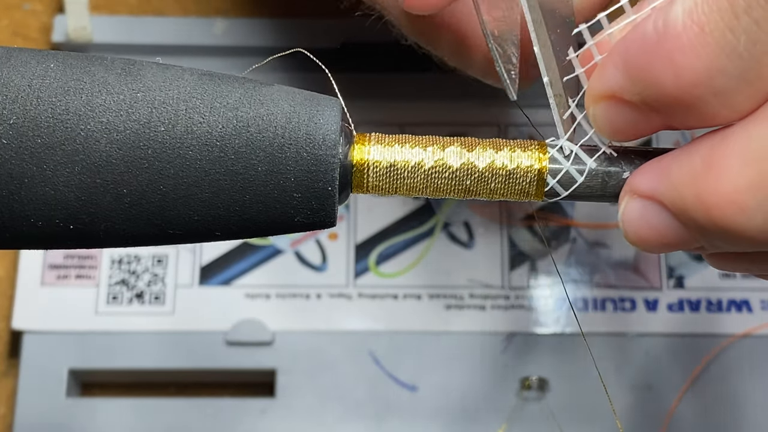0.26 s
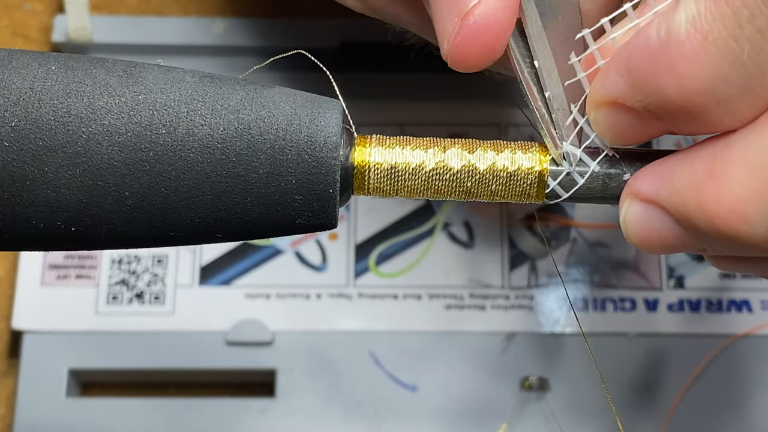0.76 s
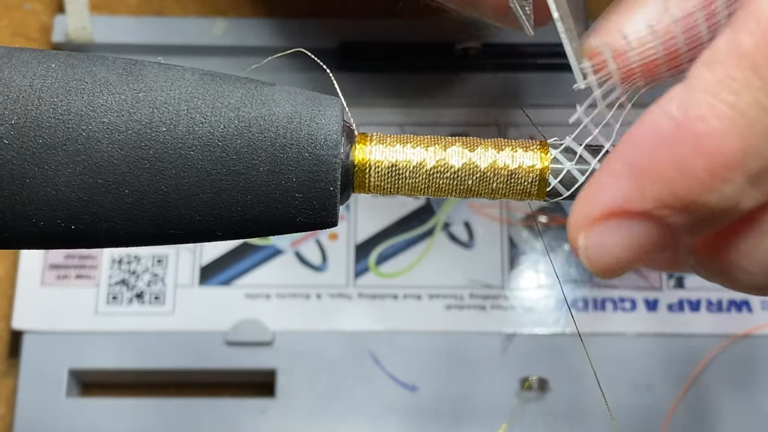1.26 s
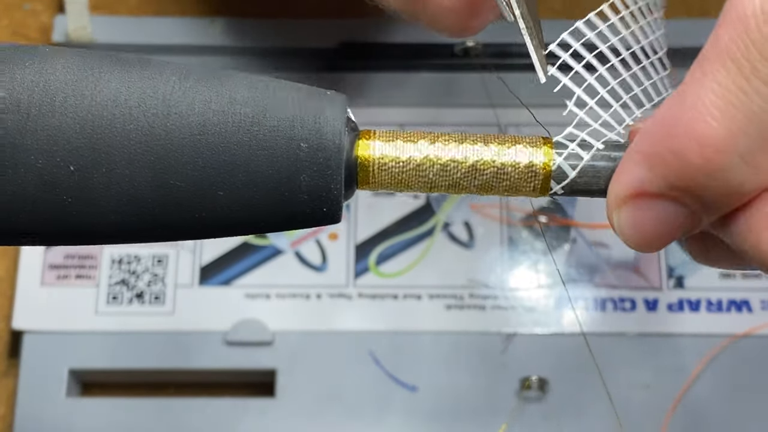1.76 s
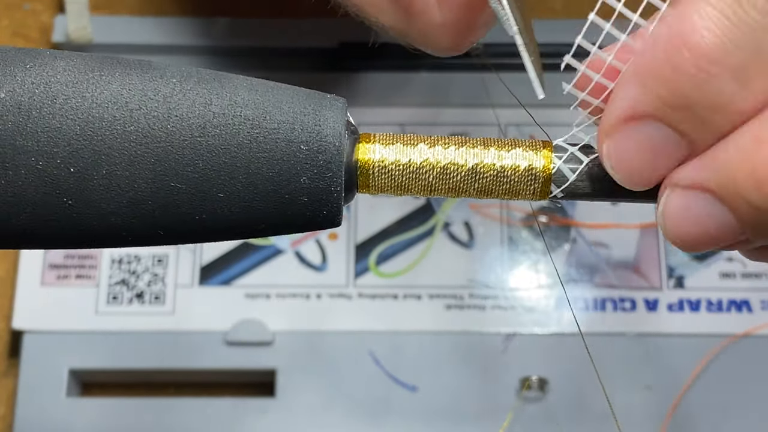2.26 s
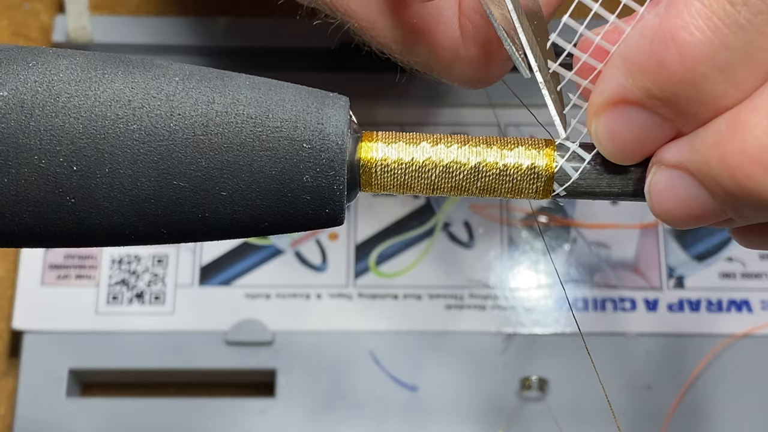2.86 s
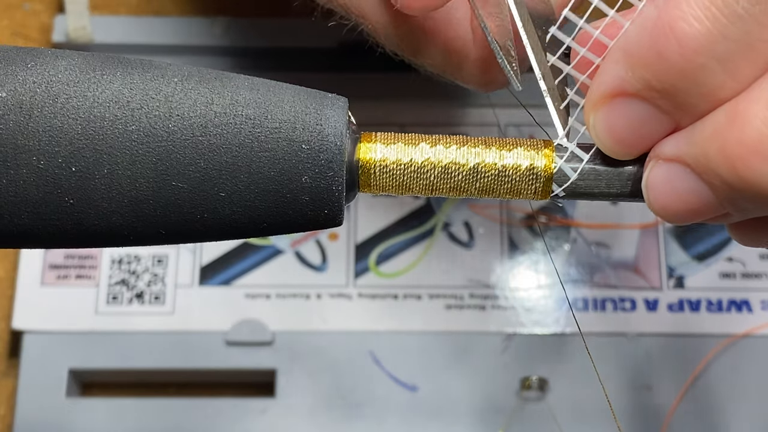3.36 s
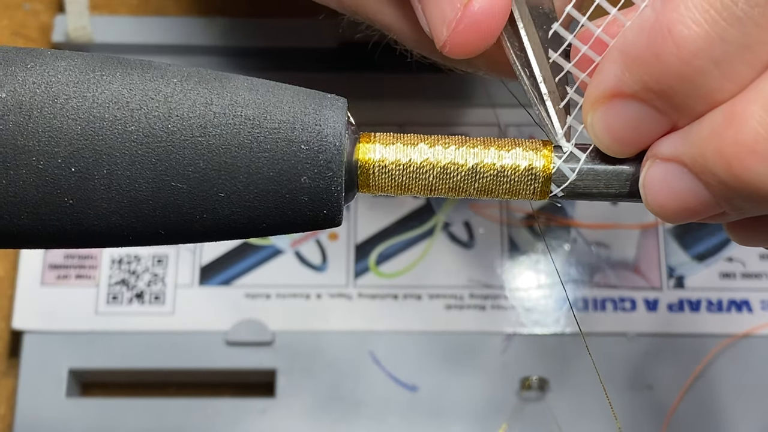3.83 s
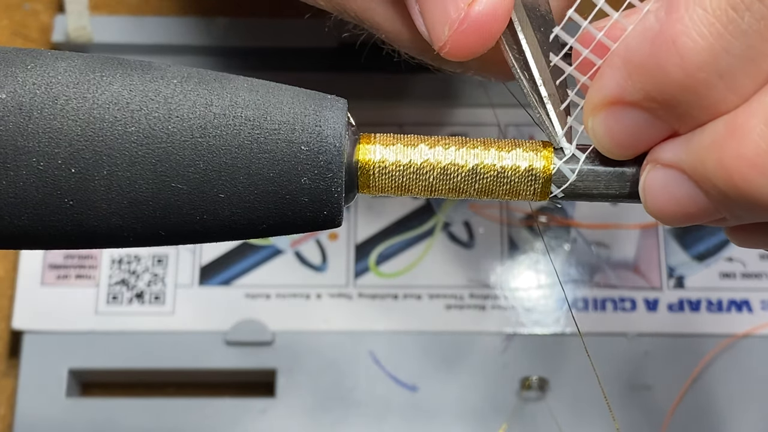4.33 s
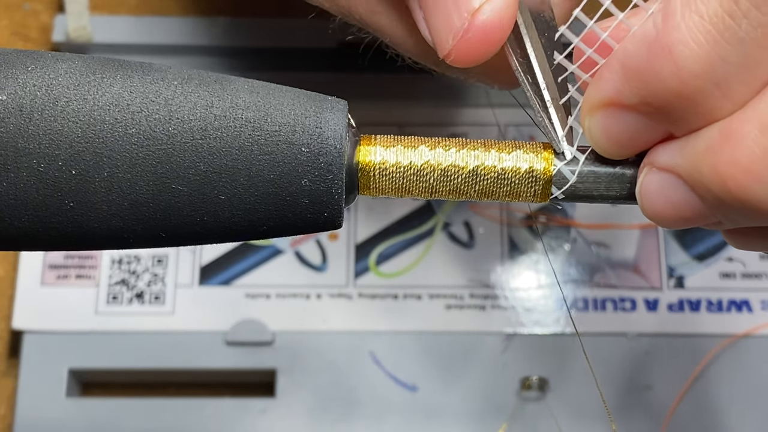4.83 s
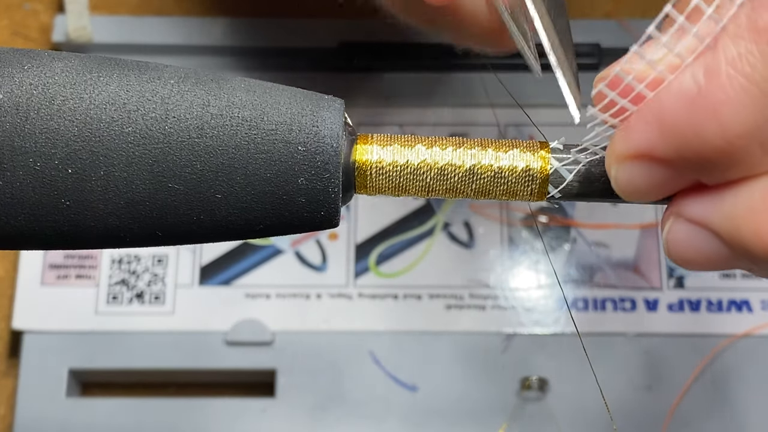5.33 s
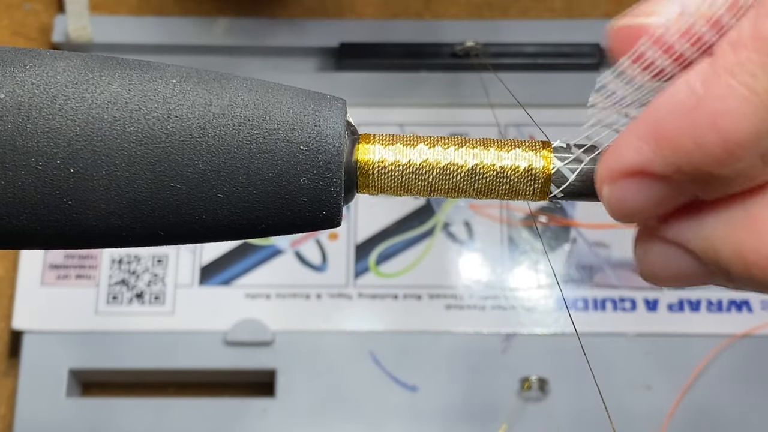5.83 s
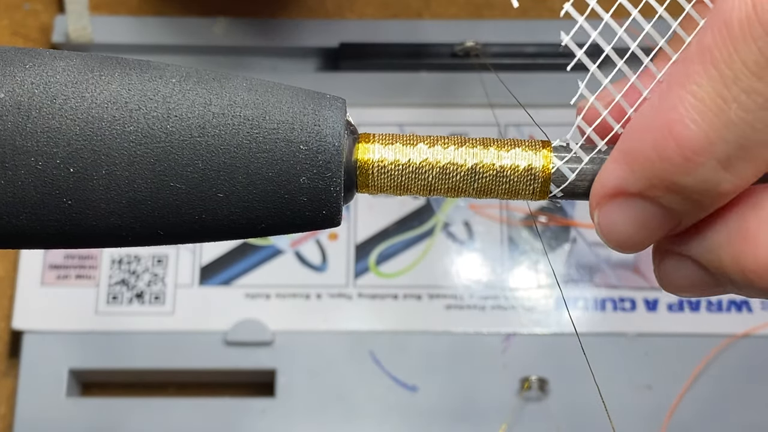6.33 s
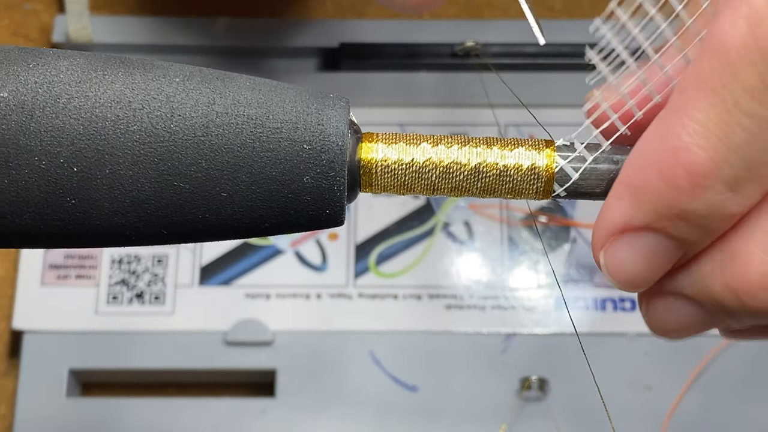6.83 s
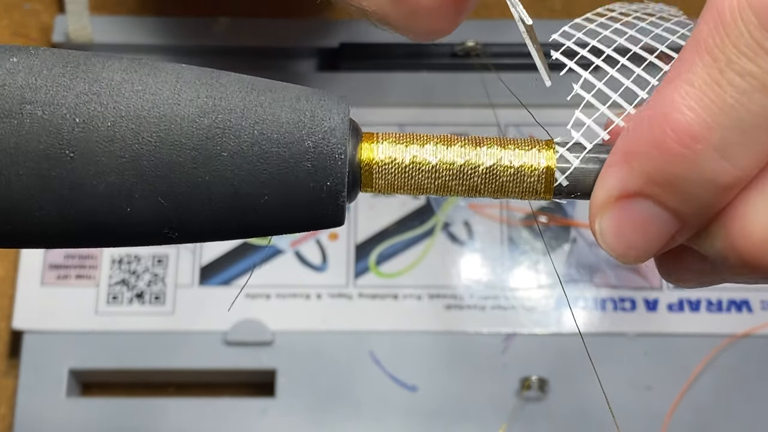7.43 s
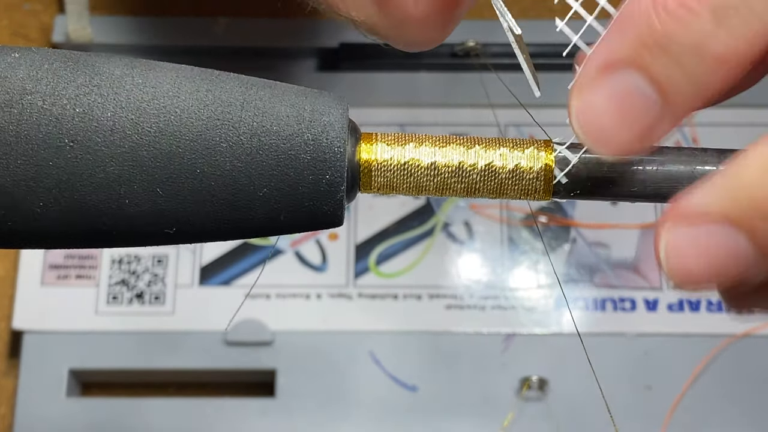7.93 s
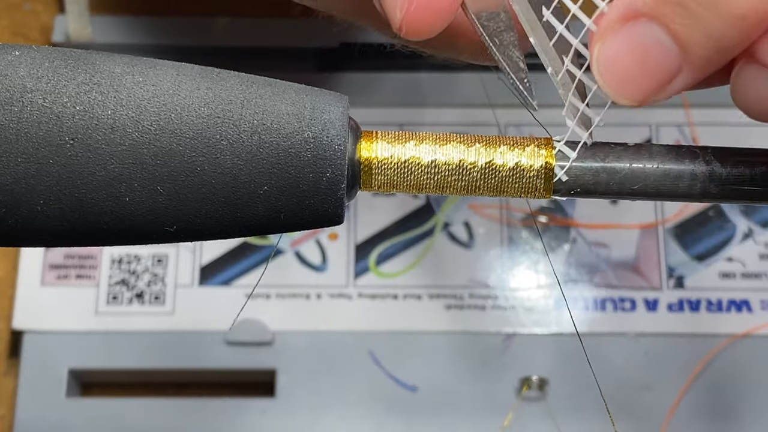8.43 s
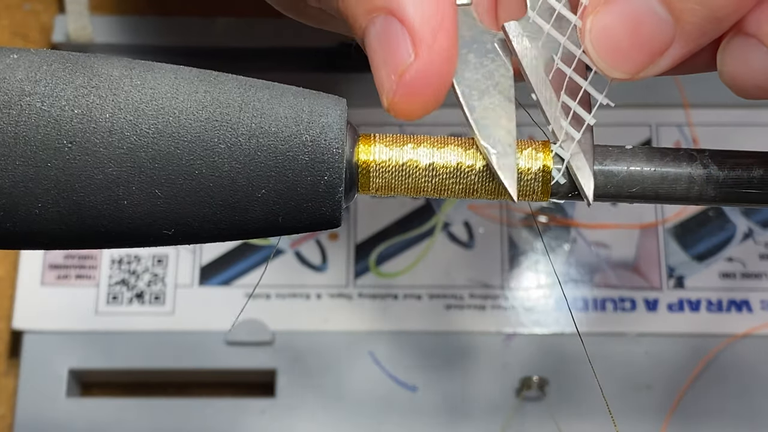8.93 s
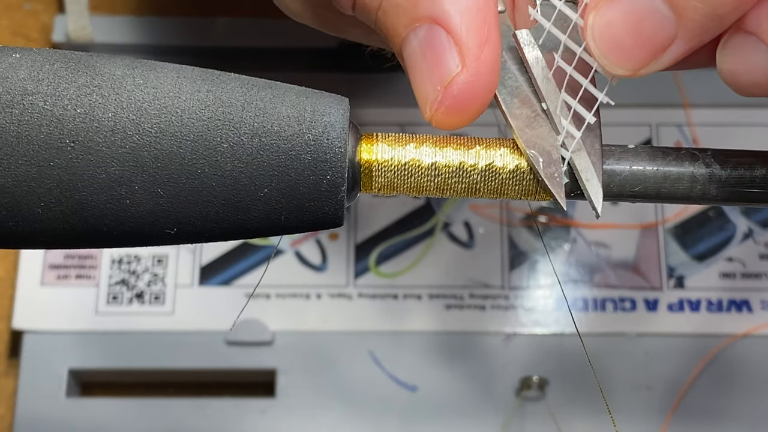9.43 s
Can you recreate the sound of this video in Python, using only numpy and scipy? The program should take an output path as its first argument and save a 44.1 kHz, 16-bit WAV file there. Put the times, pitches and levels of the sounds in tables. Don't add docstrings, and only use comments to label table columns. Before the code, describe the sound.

Close in a small, fairly dry room, small steel scissors trim mesh tape on a hollow rod. Short gritty scrapes and bright ringing ticks come irregularly, strongest just before one second, around five seconds and near the end. Between them fingers faintly rustle the tape and rub the rod, which knocks dully. A low steady motor hum and faint air rumble continue beneath.

```python
import sys
import numpy as np
from scipy import signal
from scipy.fft import rfft, irfft, next_fast_len
from scipy.io import wavfile
from scipy.ndimage import uniform_filter1d, map_coordinates

SR = 44100
rng = np.random.default_rng(int(sys.argv[2]) if len(sys.argv) > 2 else 0)


def to_linear_factor(level_db):
    exponent = np.asarray(level_db, float) / 20
    return 10 ** exponent


def generate_wav(sig):
    pcm = np.round(np.clip(np.atleast_2d(sig).T, -1, 1) * 32767).astype(np.int16)
    wavfile.write(sys.argv[1], SR, pcm)


N = 426888


def unit(x):
    return x / np.sqrt(np.mean(x ** 2) + 1e-20)


def along(points, hz):
    f, v = np.transpose(points)
    return np.interp(np.log(hz + 1), np.log(f + 1), v)


def wobble(rate):
    coarse = np.arange(0, N + 64, 64)
    knots = rng.standard_normal(int(N * rate / SR) + 4)
    return np.interp(np.arange(N), coarse, map_coordinates(knots, [coarse * rate / SR]))


def filtered(x, response):
    m = next_fast_len(len(x) + 4096)
    spectrum = rfft(x, m) * response(np.fft.rfftfreq(m, 1 / SR))
    return irfft(spectrum, m)[:len(x)]


def modes(table):
    def response(f):
        total = 0
        for k, (c, w, db) in enumerate(table):
            total = total + (-1) ** k * to_linear_factor(db) * 1j * f * w / (c * c - f * f + 1j * f * w)
        return total
    return response


def grit(n, slips_hz, slip_s, smooth):
    slips = (rng.random(n) < slips_hz / SR) * rng.random(n) * 2
    lumps = signal.lfilter([1], [1, -np.exp(-1 / (slip_s * SR))], slips)
    return rng.standard_normal(n) * (smooth + lumps)


HOLD_RINGS = {"open": (3100, 1500, 1200, 500, -5, -9), "tips": (2100, 580, 4900, 1700, -9, -30),
              "half": (3200, 1100, 6000, 1800, -7, -3), "tight": (3350, 850, 2400, 500, -18, -40),
              "deep": (4400, 1200, 3500, 500, -9, -19), "wide": (3600, 2600, 2250, 400, -7, -26),
              "point": (5400, 600, 2200, 170, -25, -35), "flat": (6600, 800, 1250, 250, -2, -14),
              "broad": (3200, 2500, 1450, 300, -3, -40), "soft": (3100, 1200, 5600, 1500, -10, -35),
              "loose": (3100, 1250, 6700, 900, 1, -25), "firm": (3400, 1150, 1100, 600, -13, -14),
              "shut": (4200, 1500, 2850, 450, 1, -18), "long": (3200, 1900, 5400, 2800, -8, -16),
              "pinch": (2200, 760, 5300, 660, -1, -35)}
# (hold [name], peak time [s], length [s], blade level [dB],
# rod over blade [dB], mesh over blade [dB])
SNIPS = [("half", .709, .1, -36, -12, -17), ("tips", 1.028, .13, -40, -35, -14),
         ("tight", 2.055, .15, -42, -3, -40), ("point", 2.258, .07, -55, -40, -30),
         ("pinch", 3.18, .09, -51, -35, -40), ("broad", 3.742, .15, -36, -11, -18),
         ("long", 4.158, .18, -40, -14, -13), ("wide", 4.724, .13, -24, -20, -8),
         ("soft", 4.996, .05, -43, -13, -18), ("shut", 5.042, .14, -32, -5, -15),
         ("tips", 5.785, .2, -76, 12, -24), ("loose", 7.105, .2, -55, -6, -26),
         ("firm", 7.85, .12, -33.5, -7, -40), ("long", 8.448, .12, -50, -6, -14),
         ("long", 9.275, .12, -47, -38, -9), ("half", 9.664, .11, -20.5, -24, -8)]
SLIDES = [
    ("open", .42, .31, -51, -14, -8),
    ("tips", .668, .12, -55, -1, -35),
    ("half", .695, .05, -50, -6, -20),
    ("flat", 1.783, .16, -47, -13, -12),
    ("soft", 1.36, .14, -65, -11, -20),
    ("soft", 3.602, .16, -59, -1, -35),
    ("deep", 5.02, .06, -31, -22, -13),
    ("deep", 5.33, .11, -52, -35, -25),
    ("deep", 5.38, .11, -64, -30, 6),
    ("open", 9.02, .14, -66, -18, -26),
]
# (rising share [of length], rise [dB], fall [dB],
# roundness [power], smooth force [share])
SNIP_SHAPE = (.22, 36, 38, .85, .65)
SLIDE_SHAPE = (.46, 27, 25, 2.2, .55)


def strokes():
    out = np.zeros(N + SR)
    for table, settings in ((SNIPS, SNIP_SHAPE), (SLIDES, SLIDE_SHAPE)):
        share, rise_db, fall_db, roundness, smooth = settings
        for hold, s, length, db, rod_db, mesh_db in table:
            u = np.arange(round(length * SR)) / (length * SR)
            rise = rise_db * abs(1 - u / share) ** roundness
            fall = fall_db * abs((u - share) / (1 - share)) ** roundness
            shape_db = -np.where(u < share, rise, fall)
            fade = np.clip(np.minimum(u, 1 - u) * length / 0.0036, 0, 1)
            force = grit(len(u), slips_hz=350, slip_s=0.0045, smooth=smooth)
            parts = ((0, grip(HOLD_RINGS[hold])), (rod_db, rod), (mesh_db, mesh))
            sound = sum(to_linear_factor(part_db) * unit(filtered(force, body)) for part_db, body in parts)
            size = fade * to_linear_factor(db + shape_db - 2.5)
            level = np.std(sound) * np.sqrt(np.mean(size ** 2))
            start = round((s - share * length) * SR)
            out[start:][:len(u)] += unit(size * sound) * level
    return out[:N]


# (ring [Hz], width [Hz], level [dB])
BLADE_RINGS = [(2530, 11, -3.5), (2800, 44, 12.5), (3430, 27, -11), (3710, 160, 8), (3750, 21, -7),
               (4480, 37, -4.5), (4390, 31, -8.5), (5456, 41, -4)]


def grip(row):
    hz, width, hz2, width2, db2, scrape_db = row

    def peak(f, c, w):
        return modes([(c, w, 0)])(f) ** 2

    def response(f):
        broad = peak(f, hz, width) + to_linear_factor(db2) * peak(f, hz2, width2)
        broad = broad + to_linear_factor(scrape_db) * peak(f, 4000, 5065)
        return broad * (1 + .6 * modes(BLADE_RINGS)(f))
    return response


# (frequency [Hz], level [dB per Hz])
MESH_COLOUR = [(5000, -29), (7000, -4.5), (8500, 3.5), (11500, 4.5), (12500, -9), (14500, -15.5),
               (16000, -19.5)]


def mesh(f):
    return to_linear_factor(along(MESH_COLOUR, f))


# (ring [Hz], width [Hz], level [dB])
ROD_RINGS = [(600, 120, -11), (678.7, 43, -8.5), (705.7, 25, -0.5), (776.7, 36, 1), (870, 70, -9),
             (1040, 84, -16.5)]


def rod(f):
    return modes(ROD_RINGS)(f) * modes([(740, 450, 0)])(f)


# (time [s], peak level [dB], ring [Hz])
TICKS = [(.709, -12, 2800), (1.0134, -36, 2130), (1.7245, -42, 2720), (2.0443, -24, 3280),
         (2.0484, -32.5, 3430), (2.0767, -24.5, 3430), (3.7437, -20.5, 3430), (4.1515, -31, 2820),
         (4.1733, -28.5, 4600), (4.7138, -19.5, 3660), (4.7192, -8, 4553), (4.7225, -10.5, 6180),
         (4.9931, -25.5, 2870), (5.008, -17.5, 4660), (5.0126, -19, 4450), (5.024, -16, 4730),
         (5.036, -9, 4450), (5.0422, -7, 3710), (7.8282, -27, 3650), (7.8461, -17, 3680),
         (7.8574, -23.5, 3710), (9.2725, -28, 5900), (9.6622, -17.5, 2940)]
# (time [s], peak level [dB])
CATCHES = [(.3147, -51), (.3541, -42), (.3782, -35), (.415, -39), (.475, -43), (.5054, -50), (.5214, -51),
           (.532, -43), (.6335, -51), (.998, -52), (1.021, -46), (1.292, -54), (1.3604, -42), (2.0288, -43),
           (2.2567, -39.5), (3.1745, -44), (3.6, -51), (3.7344, -40), (4.129, -48), (5.294, -57),
           (5.3094, -43), (5.3393, -36), (5.3777, -40), (5.7705, -47.5), (8.4317, -59), (8.4547, -39.5),
           (9.6453, -43), (9.656, -39)]


def ticks():
    snap_db = -4
    out, t = np.zeros(N + SR), np.arange(SR // 25) / SR
    moves = SNIPS + SLIDES
    for s, db, *hz in TICKS + CATCHES:
        hold, *_, mesh_db = min(moves, key=lambda move: abs(move[1] - s) / move[2])
        crack = rng.standard_normal(len(t)) * to_linear_factor(-60 * t / 0.0068) * (1 - np.exp(-t / 0.00015))
        body = filtered(crack, grip(HOLD_RINGS[hold]))
        ring_hz = (hz or HOLD_RINGS[hold])[0]
        ring = np.sin(2 * np.pi * ring_hz * t) * to_linear_factor(-60 * t / .012) * (1 - np.exp(-t / .0004))
        snap = filtered(crack, mesh)
        tick = 0.4 * body / abs(body).max() + .6 * ring
        tick = tick + to_linear_factor(mesh_db + snap_db) * snap / abs(snap).max()
        out[round((s + .0006) * SR):][:len(t)] += to_linear_factor(db - 1.5) * tick
    return out[:N]


# (time [s], length [s], level [dB], pitch [Hz])
RUSTLES = [(2.838, .14, -78.5, 2150), (3.462, .058, -79.5, 11000), (3.988, .11, -74, 3360),
           (4.23, .09, -66, 9000), (4.509, .078, -79, 5940), (1.78, .16, -54, 3300), (1.04, .1, -70, 13000),
           (4.648, .04, -74, 4100), (4.872, .16, -72, 3800), (5.249, .06, -79, 2300),
           (5.38, .1, -63, 14000), (5.93, .1, -78.5, 2200), (6.201, .25, -80, 2500), (6.65, .16, -80, 2990),
           (6.754, .11, -80, 2290), (7.38, .35, -79, 5200), (7.55, .3, -83, 2400), (8.2, .22, -82, 2410),
           (8.391, .022, -74.5, 2500), (8.619, .15, -82.5, 2800), (9.399, .1, -80, 2900)]
# (time [s], length [s], level [dB], pitch [Hz])
THUDS = [(.44, .14, -63, 1150), (2.084, .1, -66, 460), (3.75, .06, -72, 450), (4.735, .08, -61, 470),
         (4.995, .03, -59, 1200), (5.045, .076, -52, 1200), (5.049, .073, -61, 470),
         (7.115, .09, -61, 1100), (7.86, .06, -59, 500), (8.45, .06, -64, 1050), (9.02, .1, -73, 2100),
         (9.03, .08, -76, 1250), (9.669, .03, -59, 400), (9.67, .03, -39, 2200)]
# (time [s], length [s], level [dB])
RUBS = [(.76, .12, -62), (.891, .066, -74.5), (3.988, .11, -67), (4.509, .078, -60.5), (5.249, .06, -69),
        (6.754, .11, -81), (7.2, .26, -63), (7.4, .3, -75), (7.536, .13, -72), (7.634, .1, -80),
        (8.391, .022, -73), (8.5, .12, -73)]
# (time [s], peak level [dB])
KNOCKS = [(1.735, -44), (2.044, -48), (2.076, -36.5), (3.595, -68), (3.96, -69), (4.493, -57),
          (5.042, -34.5), (5.8, -49), (7.087, -41), (7.101, -33), (7.179, -53), (7.531, -63),
          (7.845, -38.5)]


def brushes():
    width_share = .35
    out = np.zeros(N + SR)
    for s, length, db, *hz in RUSTLES + THUDS + RUBS:
        force = grit(round(length * SR), slips_hz=150, slip_s=.003, smooth=0.65)
        body = rod
        if hz:
            ring = modes([(hz[0], width_share * hz[0], 0)])
            body = lambda f: ring(f) ** 2
        swell = np.hanning(len(force)) * to_linear_factor(db)
        out[round((s - length / 2) * SR):][:len(force)] += swell * unit(filtered(force, body))
    t = np.arange(SR // 8) / SR
    for s, db in KNOCKS:
        knock = filtered(rng.standard_normal(len(t)) * to_linear_factor(-60 * t / .006), rod)
        out[round(s * SR):][:len(t)] += to_linear_factor(db - 5.5) * knock / abs(knock).max()
    return out[:N]


# (frequency [Hz], time to fall 60 dB [s])
ROOM_DECAY = [(500, 0.19), (3000, 0.15), (12000, 0.094)]


def room(x):
    out, step = np.zeros(N + 2 * SR), SR // 4
    for at in range(0, N, step):
        hz, t, z = signal.stft(rng.standard_normal(SR // 3), SR, nperseg=256)
        decay = to_linear_factor(-60 * t / along(ROOM_DECAY, hz)[:, None])
        tail = signal.istft(z * decay, SR, nperseg=256)[1]
        wet = signal.fftconvolve(x[at:at + step], tail / np.linalg.norm(tail))
        out[at + 150:][:len(wet)] += wet
    return out[:N]


# (frequency [Hz], level [dB rms])
MOTOR_TONES = [(102.6, -78), (117.8, -82), (120, -54), (135, -76), (237, -87), (240, -74.5), (255, -88),
               (471.3, -91), (589.2, -84), (3122, -96), (4242, -97), (4657, -95), (4714, -87)]


def motor():
    t = np.arange(N) / SR
    out = np.zeros(N)
    for hz, db in MOTOR_TONES:
        size = to_linear_factor(db + 2.5 + 0.16 * wobble(3.1))
        drift = .1 * wobble(1.5) * (hz / 120) ** .5
        out += size * np.sin(2 * np.pi * hz * t + drift)
    return out


# (frequency [Hz], level [dB per Hz])
HISS_COLOUR = [(76, -27.5), (130, -15), (150, -19.5), (187, -30.5), (248, -28), (297, -35), (522, -44),
               (589, -37.5), (651, -40.5), (1340, -46.5), (2410, -44.5), (3910, -48), (4590, -43),
               (5080, -51.5), (16000, -66)]
# (frequency [Hz], level [dB per Hz])
RUMBLE_COLOUR = [(12, -27), (25, 4.5), (35, 2), (50, -3.5), (65, -8), (80, -19), (100, -25), (130, -38.5),
                 (180, -30.5), (220, -40.5), (480, -120)]


def air():
    z = signal.stft(rng.standard_normal(N), nperseg=512)[2]
    patches = uniform_filter1d(rng.standard_normal(z.shape), size=5, axis=0)
    patches = uniform_filter1d(patches, size=16, axis=1)
    patchy = signal.istft(z * to_linear_factor(1.1 * unit(patches)), nperseg=512)[1][:N]
    hiss = filtered(unit(patchy), lambda f: to_linear_factor(along(HISS_COLOUR, f)))
    rumble = unit(filtered(rng.standard_normal(N), lambda f: to_linear_factor(along(RUMBLE_COLOUR, f))))
    return to_linear_factor(-27.2) * hiss + to_linear_factor(-56 + 0.56 * wobble(6.7)) * rumble


# (time [s], peak level [dB], time to fade 20 dB [s])
NUDGES = [(.12, -28, .22), (1.22, -30, .12), (2.14, -22, .11), (2.8, -29.5, .1), (3.21, -32.5, .1),
          (3.85, -33.5, .25), (4.45, -39, .4), (6.25, -30, .13), (6.5, -26.5, .12), (6.85, -37, .2),
          (8.07, -34, .15), (8.52, -33.5, .15), (9.1, -44, .5), (9.68, -35, .35)]


def sway():
    resting_db = -51
    t = np.arange(N) / SR
    fast = np.sin(2 * np.pi * 12 * t + 1.5 * wobble(3))
    slow = np.sin(2 * np.pi * 4.5 * t + 1.5 * wobble(2))
    size = to_linear_factor(resting_db)
    for s, db, fade_s in NUDGES:
        size = size + to_linear_factor(db - 20 * abs(t - s) / fade_s)
    return size * unit(fast + .8 * slow) * (1 - np.exp(-t / 0.0016))


def scene():
    work = strokes() + ticks() + brushes()
    return (work + to_linear_factor(-9) * room(work) + motor() + air() + sway())[None]


def roll_off(x):
    return signal.sosfilt(signal.butter(12, 16470, fs=SR, output="sos"), x)


def record(dry):
    x = dry[0]
    level_db = 10 * np.log10(abs(uniform_filter1d(x ** 2, size=3000)) + 1e-12)
    rocked = np.clip((level_db + 39) / 2, 0, 1)

    def above(f):
        return np.clip((f - 11900) / 300, 0, 1)

    def top_band(f):
        return above(f) * np.clip((15900 - f) / 150, 0, 1)

    top = filtered(x, top_band)
    strong = abs(uniform_filter1d(top ** 2, size=1024)) > to_linear_factor(-88) ** 2
    lively = uniform_filter1d(1. * strong, size=256)
    grain = filtered(rng.standard_normal(N), top_band)
    kept = filtered(x, lambda f: 1 - above(f))
    mix = kept + lively * top + rocked * to_linear_factor(-76.5) * grain
    return roll_off(mix[None])


dry = scene()
out = record(dry)
generate_wav(out)
```